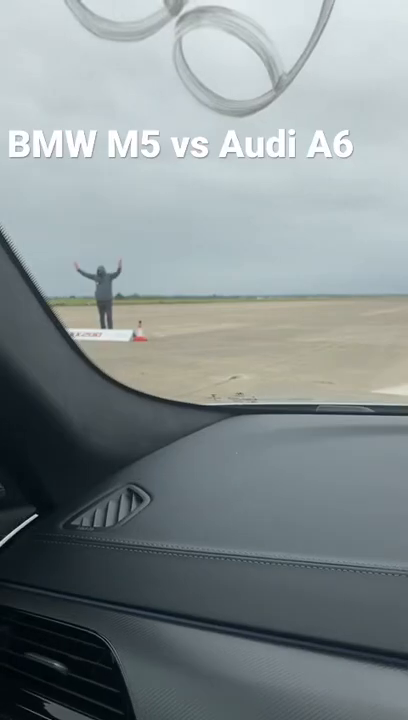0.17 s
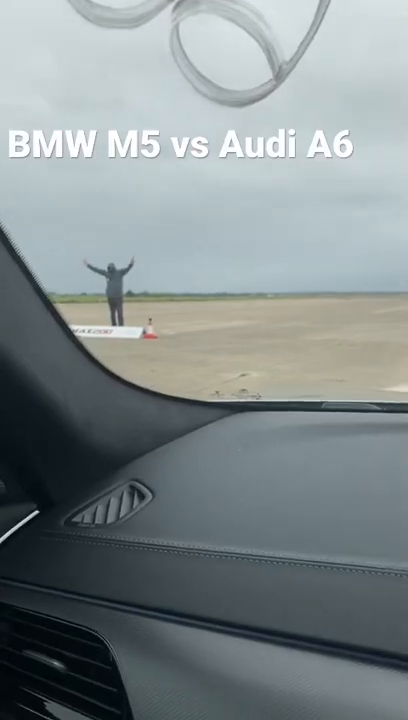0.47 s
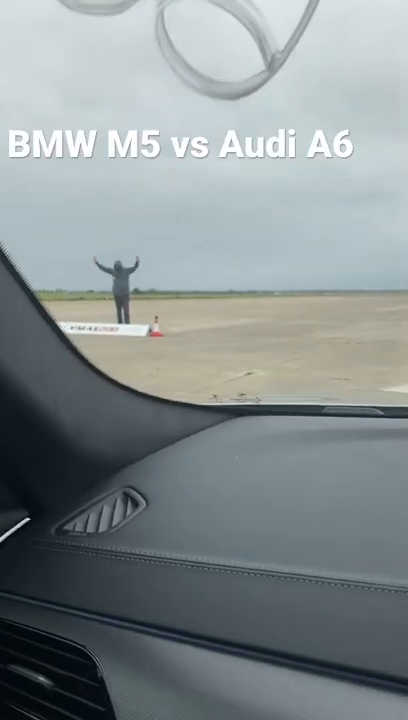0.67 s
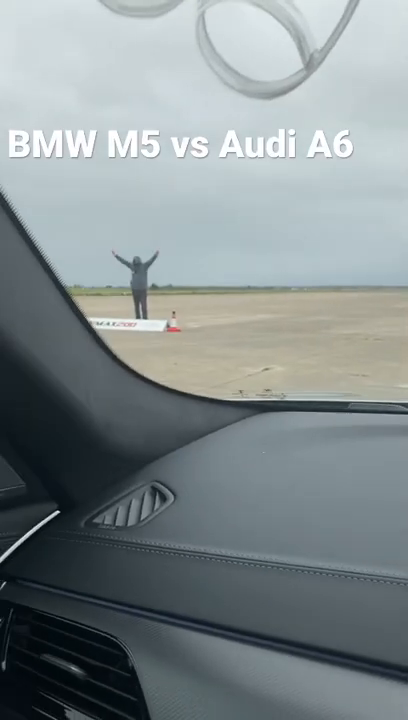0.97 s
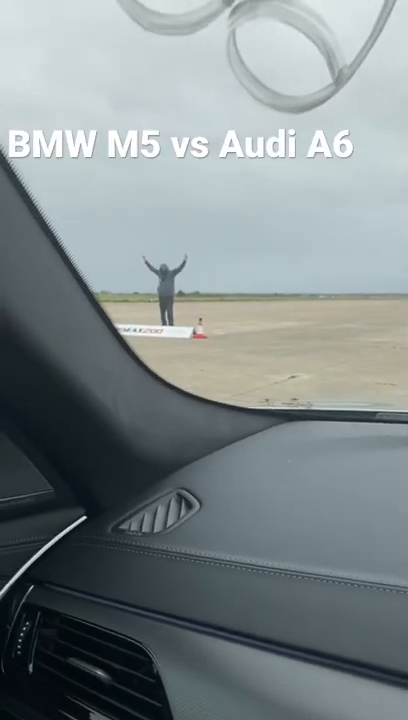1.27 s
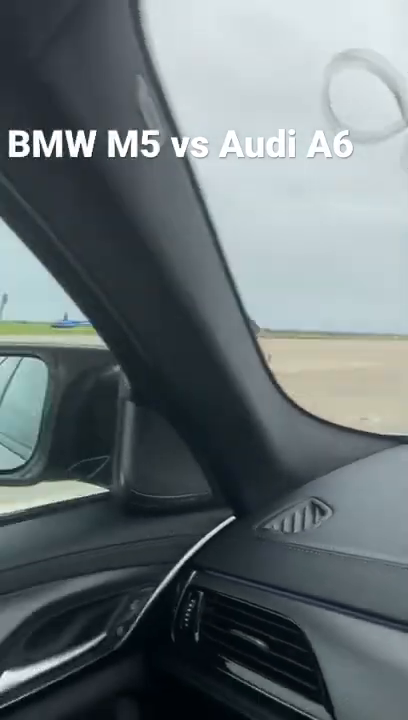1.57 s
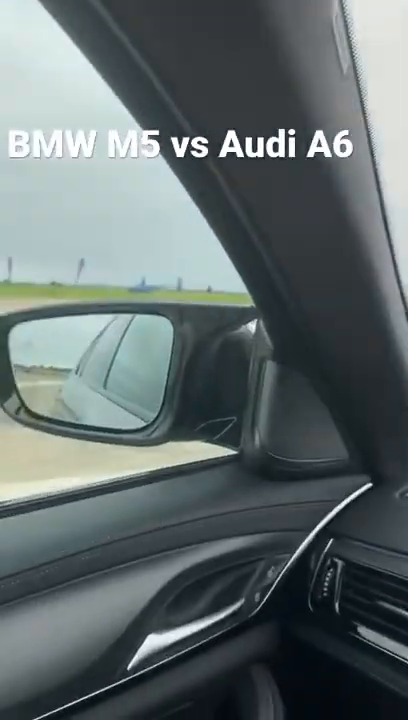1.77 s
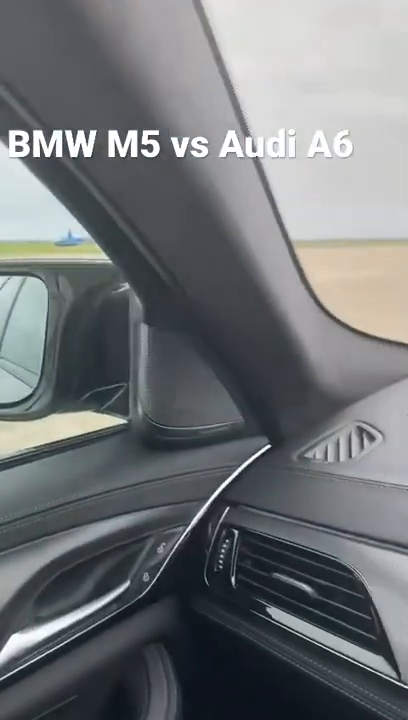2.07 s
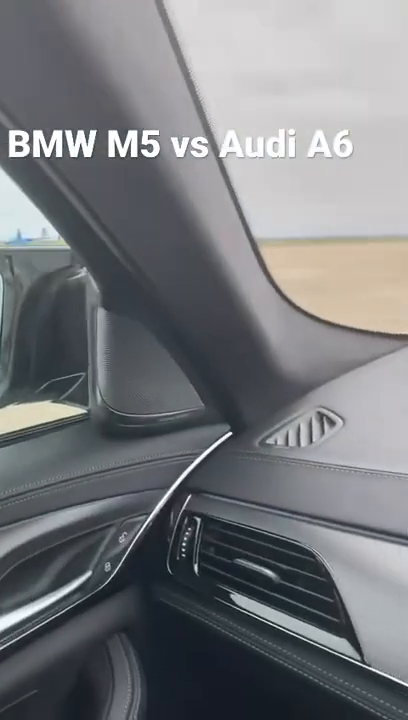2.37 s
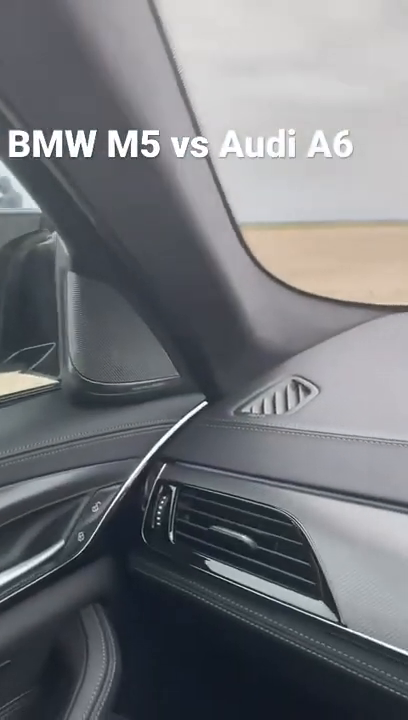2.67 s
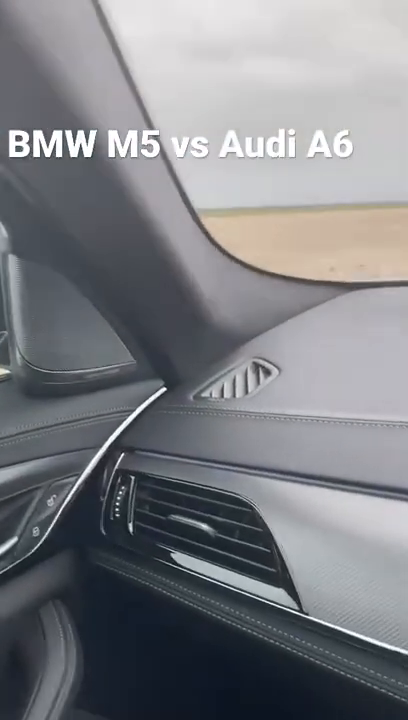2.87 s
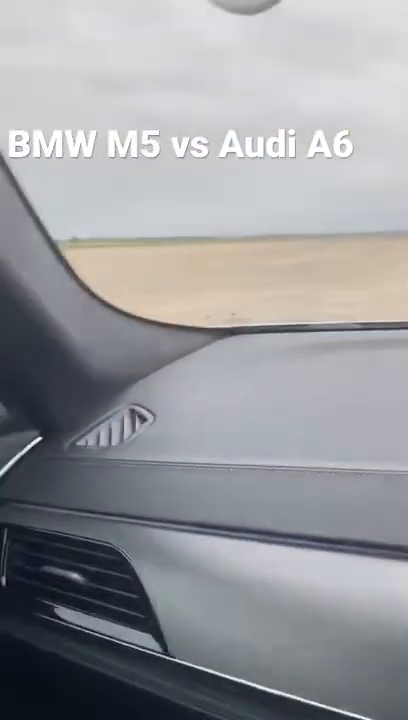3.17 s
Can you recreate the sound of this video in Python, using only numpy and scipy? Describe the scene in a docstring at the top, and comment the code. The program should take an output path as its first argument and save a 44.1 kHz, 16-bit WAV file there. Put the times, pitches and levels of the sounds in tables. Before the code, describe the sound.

A car engine, heard close inside a closed cabin, holds a muffled low rumble until about 1.3 seconds, with small phone-case ticks near 0.1 and 1.0. From 1.4 to 1.85 the phone rustles and scrapes as it swings round. The engine surges, stepping up around 1.7, then climbs steadily from 2.0 to the end at 3.3, growing into a loud, full roar over fluttering low body boom.

```python
"""Hard launch inside a closed car

The engine is held against the brake, then pulls hard through first gear: each multiple of its cycle
is a wavering tone that sweeps through the cabin resonances. A low sine with wandering pitch makes the
body boom; load-driven noise makes the roar of intake, block and tyres. The hand-held phone ticks as
contacts ring its case, and rustles, drags and scrapes as friction noise while it is turned.
Two microphone ports a few centimetres apart give the stereo image."""
import sys
import numpy as np
from scipy import signal
from scipy.fft import rfft, irfft, next_fast_len
from scipy.io import wavfile
from scipy.ndimage import uniform_filter1d

SR = 44100
rng = np.random.default_rng(int(sys.argv[2]) if len(sys.argv) > 2 else 0)


def gain_from_decibels(decibels):
    """Convert decibel values to linear amplitude factors."""
    exponent = np.asarray(decibels, float) / 20
    return 10 ** exponent


def wrap_up_sound(samples):
    """Save the sound to the file named by the first command line argument, as 16-bit audio."""
    columns = np.atleast_2d(samples).T
    # keep every value between -1 and 1, then stretch to whole-number steps
    tamed = np.clip(columns, -1, 1)
    steps = np.round(tamed * 32767).astype(np.int16)
    wavfile.write(sys.argv[1], SR, steps)


N = 145971  # length in samples

# levels are relative inside the mix
# engine run-up: t/s, two-turn cycle f/Hz, level/dB, load 0-1
ENGINE = [(0.04, 14.08, -57.0, 0.1), (0.2, 13.71, -59.0, 0.11), (0.3, 13.35, -57.5, 0.11),
          (0.45, 14.0, -57.5, 0.12), (0.6, 14.17, -58.5, 0.12), (0.95, 14.1, -58.0, 0.14),
          (1.2, 14.0, -57.5, 0.15), (1.32, 14.1, -56.0, 0.16), (1.4, 15.06, -56.5, 0.21),
          (1.5, 16.65, -52.5, 0.28), (1.6, 18.51, -50.5, 0.34), (1.7, 19.11, -44.5, 0.4),
          (1.88, 19.21, -46.0, 0.46), (2.0, 21.14, -45.5, 0.5), (2.1, 22.66, -43.5, 0.53),
          (2.2, 23.94, -43.0, 0.57), (2.3, 26.51, -41.0, 0.6), (2.4, 29.3, -39.0, 0.64),
          (2.5, 31.78, -37.5, 0.68), (2.6, 34.36, -37.0, 0.72), (2.8, 39.77, -35.0, 0.8),
          (3.0, 45.26, -32.0, 0.88), (3.15, 49.14, -31.0, 0.94), (3.31, 54.09, -30.5, 1.0)]
# strength of each cycle multiple, one row each from the first:
# held against the brake/dB, at launch/dB, as boost builds/dB, at high revs/dB
ORDER_DB = [(-.5, 1.5, 4, -9.5), (1, 14, -4, -2), (3.5, 0, 1, -1), (7, -2.5, -4.5, 2), (1, 0, 3, 1.5),
            (15.5, 9, 14.5, 18), (4.5, -5.5, 16.5, 20), (13.5, 9, 17, 11), (-4, -11, 1, 4.5),
            (-8, -.5, 16.5, 14), (-8, 3.5, 10, 1), (3, 14.5, 12.5, 8.5), (-8, 0, -9.5, -9), (-12, 5, 2, 4),
            (-2, 14, 9, 1), (-4, 2, .5, 0), (-12, 1, -18, -12.5), (-1, 3, -1, 5.5), (-12, -14.5, -15, -25),
            (0, 2, 1, 5.5), (8, -13.5, -15, -21), (6, -11, -19.5, -19), (3, -10, 0, 3.5),
            (6, -8.5, -21.5, -16), (-1, -16.5, -19, -23), (-1.5, -18, -5.5, -5)]
# moments the four columns of ORDER_DB belong to: t/s
ORDER_TIMES = [1.3, 1.9, 2.6, 3.2]
# cabin response to the engine: f/Hz, level/dB, left minus right/dB, lead of the left/rad
CABIN = [(30.0, -1.0, -0.5, -0.1), (50.0, 14.0, -0.5, -0.1), (65.0, 17.0, -0.5, -0.1),
         (80.0, 12.5, -0.5, -0.0), (92.0, 21.5, -1.0, -0.0), (105.0, 22.0, -1.5, -0.0),
         (120.0, 18.5, -1.0, 0.0), (140.0, 17.0, -0.5, -0.0), (165.0, 8.5, -1.0, 0.0),
         (190.0, 1.0, -0.5, -0.0), (220.0, 0.5, -0.0, -0.0), (255.0, 1.5, -0.5, -0.1),
         (290.0, -4.0, -0.5, -0.2), (325.0, -5.0, -2.0, -0.5), (360.0, -5.5, -4.0, -0.5),
         (400.0, -7.0, -7.0, -0.6), (440.0, -8.5, -7.5, 0.4), (480.0, 2.0, -6.5, 0.3),
         (520.0, -1.5, -6.5, 0.2), (570.0, -10.5, -5.5, 0.3), (640.0, -3.5, -4.5, 0.8),
         (700.0, -6.5, -7.5, -0.7), (760.0, -8.5, -2.0, 3.0), (830.0, -9.5, 1.0, 0.1),
         (900.0, -7.0, 2.0, 0.3), (980.0, -7.5, 1.5, 0.5), (1070.0, -10.5, 2.5, 0.5),
         (1130.0, -13.5, -1.5, 0.5), (1200.0, -24.0, 0.5, 0.4), (1400.0, -10.5, 2.5, 1.1)]
# narrow body panel resonance: f/Hz, half width/Hz, level/dB
PANELS = [(108.5, 2.2, 6)]
# extra port difference in the bass while held: f/Hz, left minus right/dB, lead of the left/rad
HELD_BASS = [(55, -1, 0), (80, -2.5, .6), (105, -1.2, 1), (140, -1, 1.4), (180, -.5, 1.9), (260, 0, 0)]
# start and end of the fade of that difference: t/s
HELD_BASS_FADE = [1.25, 2.15]
WAVER_DB, WAVER_PER_S, SPEED_JITTER = 1.8, 8, .0015  # jitter is a share of the engine speed

# roar spectrum standing: f/Hz, level/dB per Hz
ROAR_STILL = [(25, -28), (50, -8.5), (100, -7), (140, -21), (220, -26.5), (320, -23.5), (500, -33.5),
              (900, -36.5), (1400, -49), (2800, -58.5), (5000, -81), (11000, -70.5)]
# roar spectrum at speed: f/Hz, level/dB per Hz
ROAR_FAST = [(25, -14.5), (50, 2.5), (110, 1), (180, -3), (300, -0.5), (550, -8), (900, -19), (1300, -27.5),
             (2000, -34), (3000, -45), (5000, -69.5), (11000, -57)]
# likeness of the roar at the two ports: f/Hz, correlation 0-1
ROAR_LIKE = [(60, 0.5), (300, 1), (1000, 0.6), (3000, 0.4), (10000, 0.02)]
ROAR_STILL_DB, ROAR_FAST_DB, ROAR_POWER = -33.5, -22, 2.47  # the power bends load into amplitude

# body boom over the road, ahead of its trim: t/s, level/dB
BOOM = [(0.04, -29), (0.2, -38), (0.22, -30), (0.63, -39), (0.76, -25), (0.8, -38), (0.89, -29),
        (0.95, -42), (1.34, -29), (1.54, -38), (1.75, -15), (1.87, -33), (1.89, -21), (2.1, -33),
        (2.18, -20), (2.21, -29), (2.46, -16), (2.6, -27), (2.7, -16), (2.74, -31), (2.79, -14),
        (2.84, -24), (3.17, -27), (3.31, -23)]
BOOM_HZ, BOOM_WANDER, BOOM_TRIM_DB = 56.1, 0.11, -2.5  # wander is a share of the pitch

# fingers and cloth sliding on the phone: t/s, level/dB
RUSTLE = [(0.04, -87), (0.3, -89.5), (0.4, -73.5), (0.6, -90), (1.3, -86), (1.38, -59.5), (1.44, -54.5),
          (1.5, -52.5), (1.55, -59), (1.62, -69.5), (1.67, -55), (1.72, -42), (1.76, -61), (1.8, -73),
          (1.86, -70), (2.16, -74.5), (2.2, -61.5), (2.45, -59.5), (2.51, -58.5), (2.58, -69.5),
          (2.68, -77.5), (2.84, -59), (3.14, -64), (3.3, -60.5)]
# colour of all friction noise: f/Hz, level/dB per Hz
RUSTLE_COLOUR = [(150, -39.5), (300, -0.5), (700, -2.5), (1300, -6), (2400, -10), (4000, -10.5),
                 (6000, -13), (8500, -5.5), (11000, -19.5)]
# duller drag of the palm on the case while the phone swings round: t/s, level/dB
DRAG = [(1.3, -76), (1.37, -59.5), (1.45, -53), (1.55, -51.5), (1.63, -55), (1.68, -55.5), (1.72, -49),
        (1.77, -51), (1.8, -60), (1.9, -77.5)]
# filter for the drag, laid over the friction colour: f/Hz, gain/dB
DRAG_COLOUR = [(250, -21.5), (600, -6), (1500, 0), (3500, -1.5), (6000, -16), (11000, -15)]
GRAINS_PER_S, GRAIN_DB = 2500, 2.5  # GRAIN_DB is the mean of the random lift of a grain
GRIP_SPREAD = 0.22  # share of the friction that differs between the ports

# ticks of the phone case: t/s, level/dB, strongest ring near f/Hz, time for the contact to peak/s
TICKS = [(0.130, -31, 2960, 0.004), (0.271, -57, 2076, 0.0054), (0.526, -44.5, 1740, 0.0022),
         (0.97, -42.5, 3600, 0.0033), (0.9775, -32.5, 4004, 0.0027), (0.99, -46, 2905, 0.0021),
         (2.599, -41.5, 2000, 0.0038)]
# ringing modes of the case: f/Hz, level/dB, t60/s
CASE_MODES = [(1740, -3, 0.03), (2000, -6, 0.015), (2400, -8, 0.012), (2960, -1, .035), (3400, -2, 0.016),
              (3670, -1, 0.016), (3920, -2, 0.018), (5000, -14, .012), (6590, -3, 0.012), (7400, 3, .012),
              (8200, 3, .012), (9300, 0, .012)]
TICK_FOCUS_DB_PER_OCT = 22  # how fast modes weaken away from the struck one

# scrapes where the grip slips: t/s, level/dB, upper band edge f/Hz, decay time/s
SCRAPES = [(1.269, -42.5, 444, 0.021), (1.382, -44.5, 4940, 0.0023), (1.464, -33.5, 3970, .007),
           (1.489, -45, 8910, 0.0071), (1.53, -41.5, 8850, 0.0064), (1.591, -34.5, 1360, 0.004),
           (1.68, -44, 6910, 0.0043), (1.697, -36.5, 2477, 0.0084), (1.72, -37, 8980, 0.022),
           (1.739, -31, 3240, 0.007), (1.767, -40.5, 4970, 0.0038), (1.834, -40.5, 790, .018),
           (2.062, -48, 1490, 0.0087)]
SCRAPE_RISE_S = .004

PORT_LAG = 4  # samples by which the right port hears noise and handling late
START_S, TOP_HZ = .0352, 11500


def curve(table, axis=1):
    """A column of a time table at every sample."""
    table = np.array(table, float)
    return np.interp(np.arange(N) / SR, table[:, 0], table[:, axis])


def at_hz(table, hz, axis=1):
    """A column of a spectrum table, read on a log-frequency axis."""
    table = np.array(table, float)
    return np.interp(np.log(np.maximum(hz, 1)), np.log(table[:, 0]), table[:, axis])


def colour(x, table):
    """Filter by a spectrum table and set the rms to 1."""
    size = next_fast_len(N)
    hz = np.arange(size // 2 + 1) * SR / size
    y = irfft(rfft(x, size) * gain_from_decibels(at_hz(table, hz)), size)[..., :N]
    return y / np.sqrt(np.mean(y ** 2))


def walk(rate):
    """Random drift gliding between new values, rate of them a second; spread near 1."""
    hold = int(SR / rate)
    steps = np.repeat(rng.standard_normal(N // hold + 1), hold)
    return uniform_filter1d(steps, hold)[:N] * 1.2  # restores the spread lost in the glide


def engine():
    """Every multiple of the cycle is a wavering tone, coloured per port by the cabin as it sweeps."""
    t = np.arange(N) / SR
    cycle_hz = curve(ENGINE) * (1 + SPEED_JITTER * walk(25))
    phase = 2 * np.pi * np.cumsum(cycle_hz) / SR
    held = np.interp(t, HELD_BASS_FADE, [1, 0])
    sides = np.array([[.5], [-.5]])  # each port takes half of a left-right difference
    out = np.zeros((2, N))
    for k, order_db in enumerate(ORDER_DB, 1):
        hz = k * cycle_hz
        db = curve(ENGINE, axis=2) + np.interp(t, ORDER_TIMES, order_db) + at_hz(CABIN, hz)
        for panel_hz, half_width, peak_db in PANELS:
            db = db + peak_db / (1 + ((hz - panel_hz) / half_width) ** 2)
        db = db + WAVER_DB * walk(WAVER_PER_S)
        tilt_db = at_hz(CABIN, hz, axis=2) + held * at_hz(HELD_BASS, hz)
        lead = at_hz(CABIN, hz, axis=3) + held * at_hz(HELD_BASS, hz, axis=2)
        start = 2 * np.pi * rng.random()
        out += gain_from_decibels(db + sides * tilt_db) * np.sin(k * phase + start + sides * lead)
    return out


def pair(table):
    """Coloured noise at two ports: shared and opposed parts set the likeness at each frequency."""
    size = next_fast_len(N)
    like = at_hz(ROAR_LIKE, np.arange(size // 2 + 1) * SR / size)
    shared, opposed = rfft(rng.standard_normal((2, size)))
    both = np.sqrt(1 + like) * shared + np.sqrt(1 - like) * opposed * np.array([[1], [-1]])
    return colour(irfft(both, size)[:, :N], table)


def roar():
    """Intake, block and tyres: broad flickering noise, a steady bed plus a part that grows with load."""
    load = curve(ENGINE, axis=3)
    flicker = gain_from_decibels(0.83 * walk(17))
    still = gain_from_decibels(ROAR_STILL_DB) * pair(ROAR_STILL)
    fast = load ** ROAR_POWER * gain_from_decibels(ROAR_FAST_DB) * pair(ROAR_FAST)
    return flicker * (still + fast)


def boom():
    """Road bumps shake the lowest body resonance, a sine whose pitch wanders."""
    hz = BOOM_HZ * (1 + BOOM_WANDER * walk(12))
    level = np.sqrt(2) * gain_from_decibels(curve(BOOM) + BOOM_TRIM_DB)  # rms to peak of a sine
    return level * np.sin(2 * np.pi * np.cumsum(hz) / SR)


def grains():
    """Friction: dense uneven clicks over a steady hiss, mostly shared by both ports."""
    hit = rng.random(N) < GRAINS_PER_S / SR
    size = hit * gain_from_decibels(GRAIN_DB * rng.exponential(size=N))
    size = size / size.std() + 1.2  # the constant is the steady hiss
    shared, opposed = size * rng.standard_normal((2, N))
    return colour(shared + GRIP_SPREAD * opposed * np.array([[1], [-1]]), RUSTLE_COLOUR)


def rustle():
    """Continuous sliding: a bright hiss of fingers and cloth plus the duller drag of the palm."""
    drag = colour(grains(), DRAG_COLOUR) * gain_from_decibels(curve(DRAG) + 2.7 * walk(40))
    hiss = grains() * gain_from_decibels(curve(RUSTLE) + 4.5 * walk(30))
    return hiss + drag


def ticks():
    """A short rough contact rings the modes of the case, most those near where it is struck."""
    out, t = np.zeros(N), np.arange(4000) / SR
    for s, db, near_hz, length in TICKS:
        push = rng.standard_normal(len(t)) * (t / length) * np.exp(-t / length)
        ring = np.zeros(len(t))
        for hz, mode_db, t60 in CASE_MODES:
            octaves = min(abs(np.log2(hz / near_hz)), .9)  # far modes weaken no further
            decay_db = mode_db - TICK_FOCUS_DB_PER_OCT * octaves - 60 * t / t60
            ring += gain_from_decibels(decay_db) * np.sin(2 * np.pi * hz * t)
        x = signal.fftconvolve(push, ring)[:len(t)]
        x = x / np.abs(x).max() + 0.2 * np.diff(push, prepend=0)  # adds the bare contact crackle
        i = int((s - length) * SR)
        out[i:i + len(t)] += gain_from_decibels(db) * x
    return out


def scrapes():
    """Slips of the grip: band-limited bursts of friction with a fast rise and an exponential decay."""
    source, out, t = grains(), np.zeros((2, N)), np.arange(5000) / SR
    for s, db, top_hz, length in SCRAPES:
        i = int((s - SCRAPE_RISE_S / 2) * SR)
        sos = signal.butter(2, [top_hz / 7, top_hz], "bandpass", fs=SR, output="sos")
        x = signal.sosfilt(sos, source[:, i:i + len(t)])
        rise = np.minimum(t / SCRAPE_RISE_S, 1) ** 2
        decay = np.exp(-t / max(length, .003))  # never shorter than 3 ms
        out[:, i:i + len(t)] += gain_from_decibels(db + 6.0) * x / x.std() * rise * decay
    return out


def scene():
    """Engine and boom fill the cabin; noise and handling reach the right port late."""
    side_on = roar() + rustle() + ticks() + scrapes()
    side_on[1] = np.roll(side_on[1], PORT_LAG)
    boom_pair = boom() * gain_from_decibels([[-.4], [.4]])  # dB, a touch stronger on the right
    return engine() + boom_pair + side_on


def band_limit(x):
    """A steep low-pass at the top of the band."""
    return signal.sosfilt(signal.butter(12, 11130, fs=SR, output="sos"), x)


def record(dry):
    """Sound starts after a short blank; the phone cuts the deepest bass and the top and rounds the peaks."""
    x = signal.sosfilt(signal.butter(2, 21, "highpass", fs=SR, output="sos"), dry)
    x = 1.429 * np.tanh(x / 1.183)
    x = x * np.clip((np.arange(N) / SR - START_S) / .0015, 0, 1)  # 1.5 ms fade-in
    x = signal.sosfilt(signal.butter(8, TOP_HZ, fs=SR, output="sos"), x)
    return band_limit(x)


dry = scene()
out = record(dry)
wrap_up_sound(out)
```